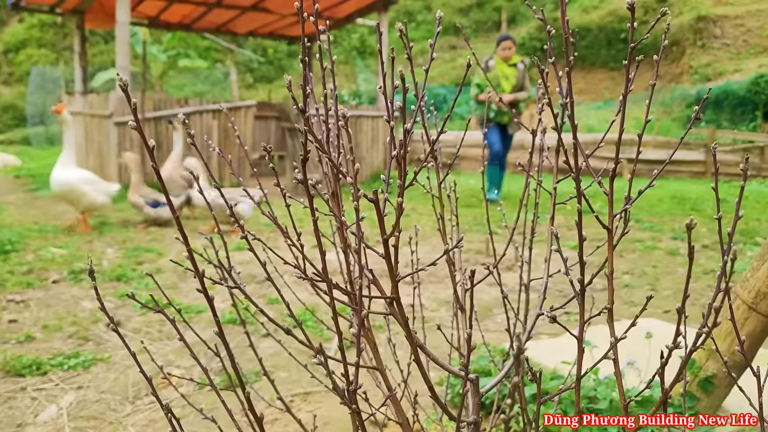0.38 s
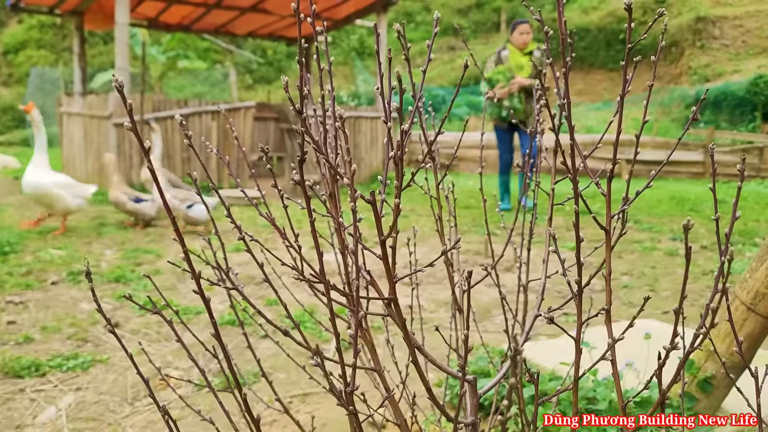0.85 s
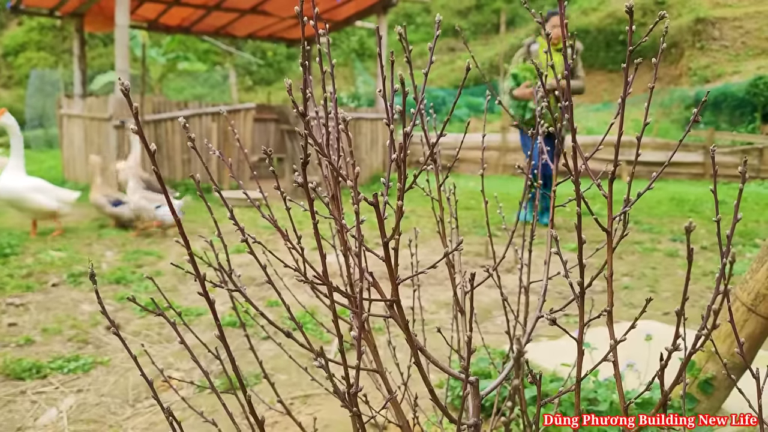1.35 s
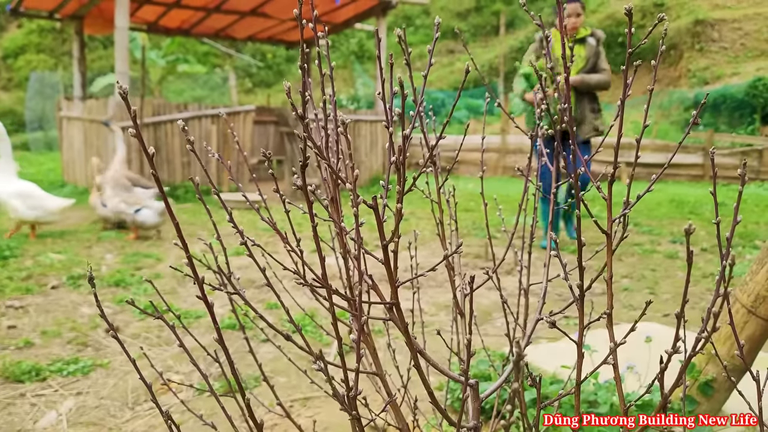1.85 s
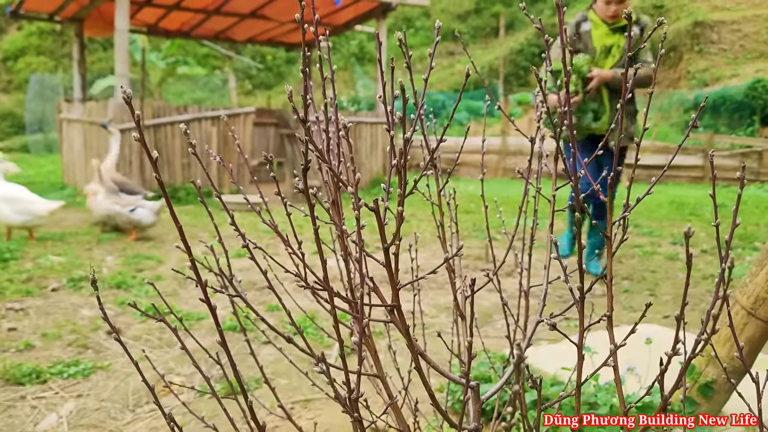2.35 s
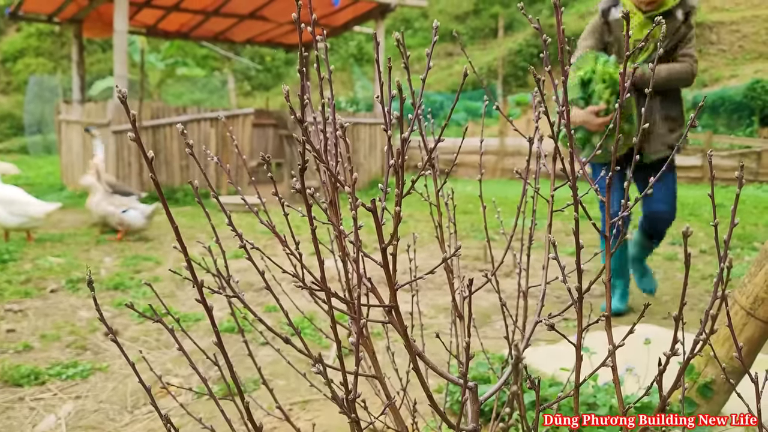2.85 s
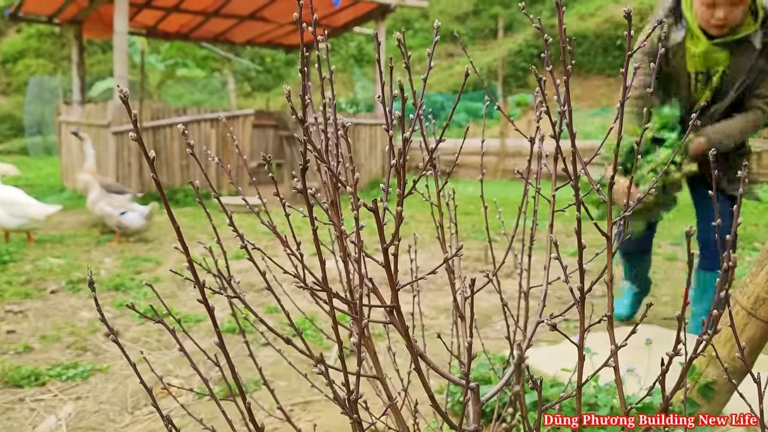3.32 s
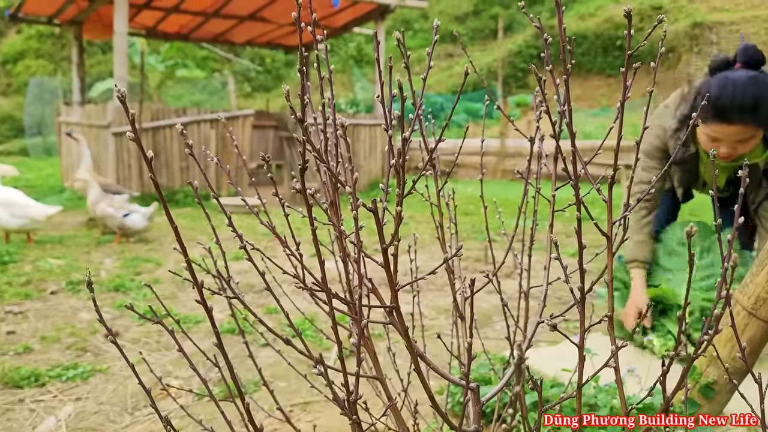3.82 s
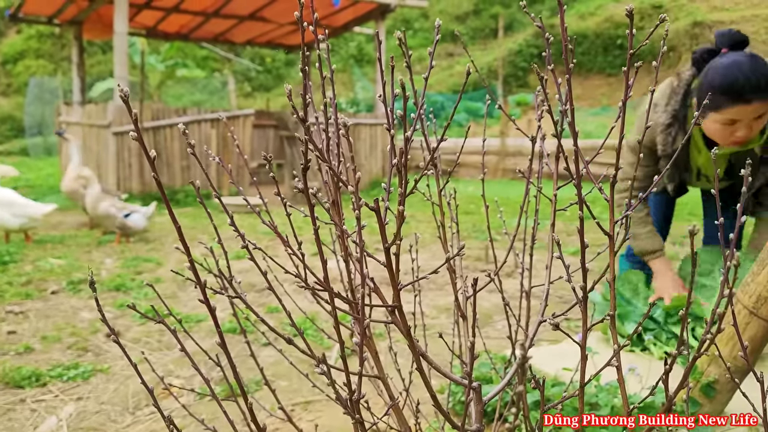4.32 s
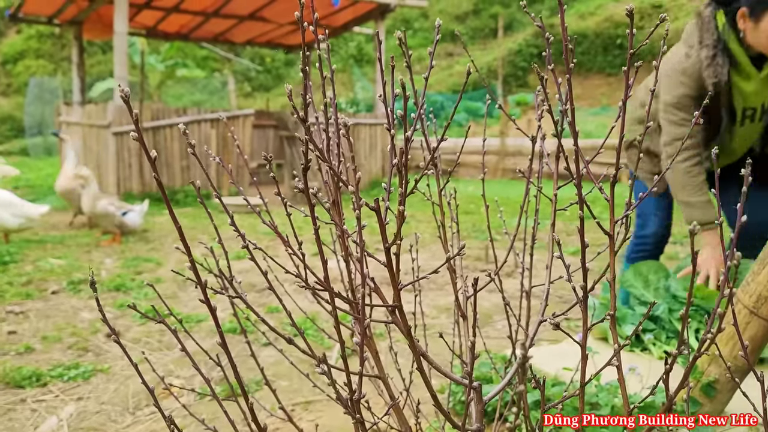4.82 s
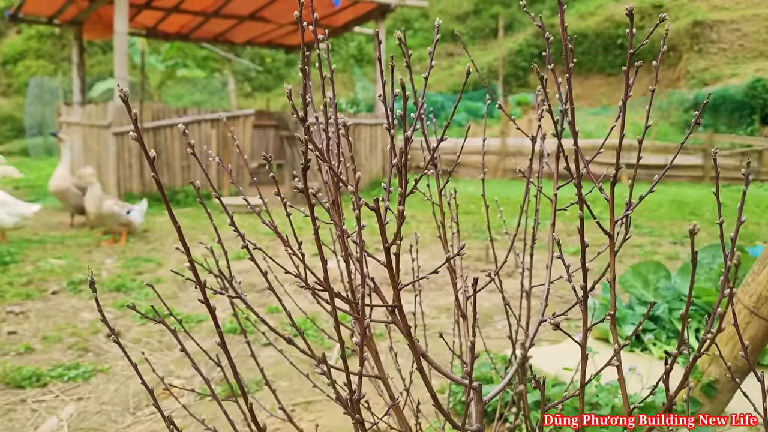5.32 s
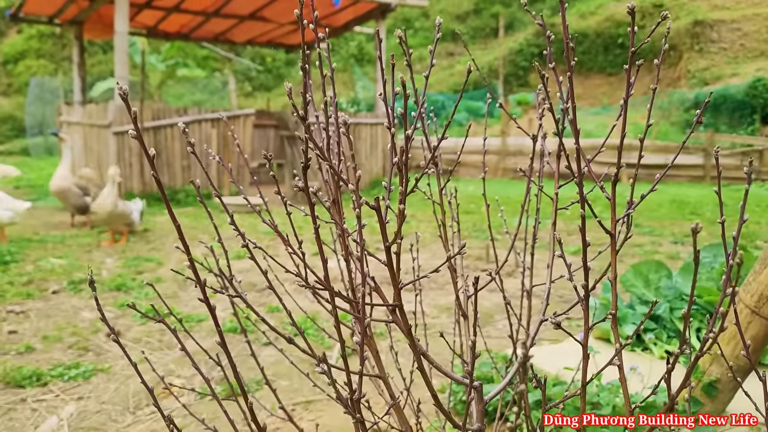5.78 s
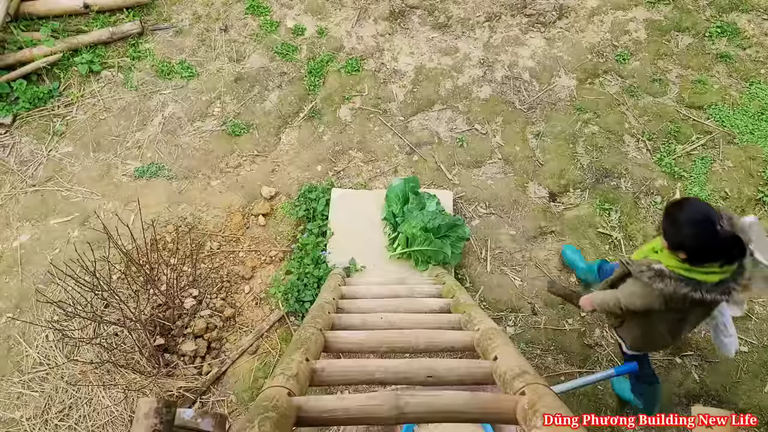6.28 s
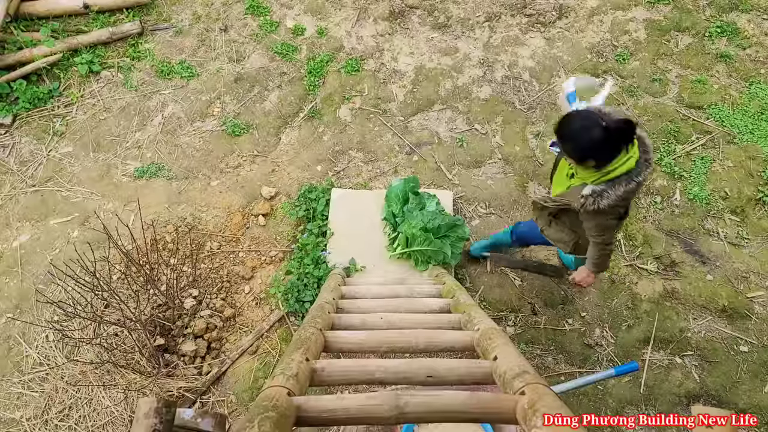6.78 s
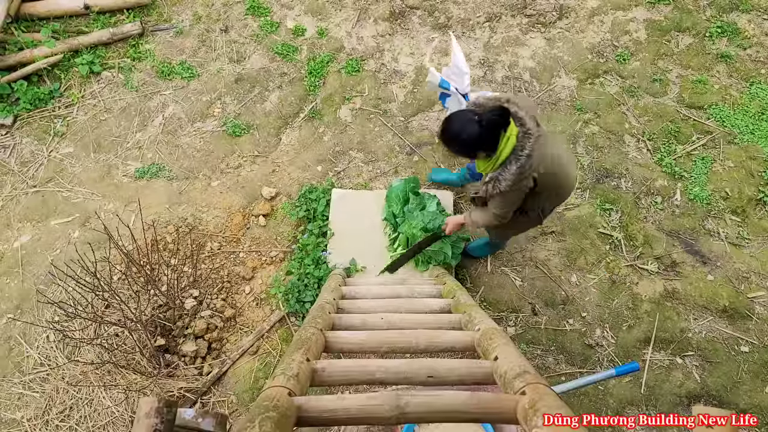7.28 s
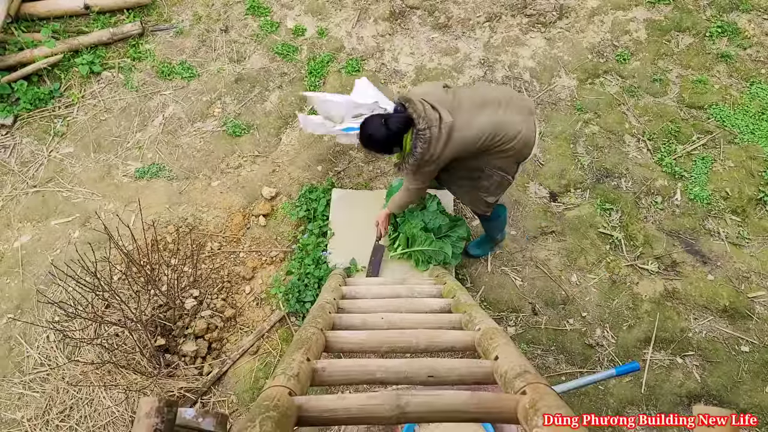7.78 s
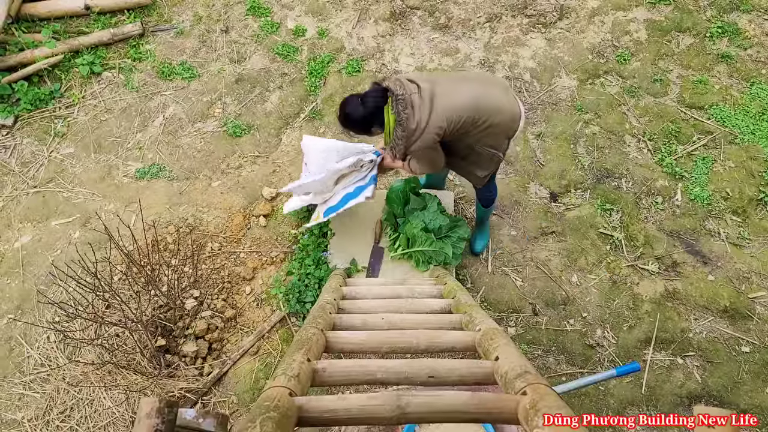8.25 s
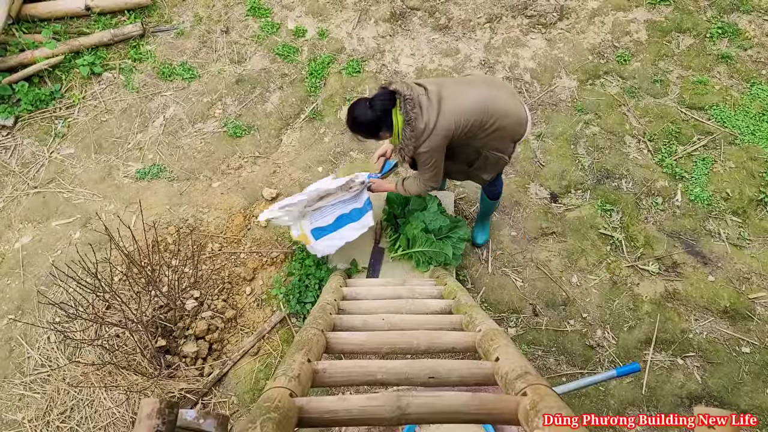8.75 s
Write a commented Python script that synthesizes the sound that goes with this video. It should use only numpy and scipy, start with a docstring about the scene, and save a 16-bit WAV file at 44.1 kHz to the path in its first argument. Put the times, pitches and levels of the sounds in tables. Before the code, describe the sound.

Two geese honk by turns in a farm yard, harsh and brassy, with low grunts, boot thumps, rustling leaves and a knife clinking on a slab.

```python
"""Two geese honk in turn on a farm yard: several windpipe modes sound at once and the lead hops between them;
a membrane driven by the modes adds overtones and rasp. Thin whimpers glide; low grunts are pulses ringing
chest and throat. Boots thump damped sines into soil, leaves and a sack rustle as noise grains, a steel knife
rings on a slab. Air, insects, breeze and a faint yard echo lie under it. A 64 ms silence parts two spots;
in the second one the short honks come from another direction."""
import sys
import numpy as np
from scipy import signal
from scipy.fft import rfft, irfft, next_fast_len
from scipy.io import wavfile
from scipy.ndimage import uniform_filter1d, minimum_filter1d, map_coordinates

SR = 44100
rng = np.random.default_rng(int(sys.argv[2]) if len(sys.argv) > 2 else 0)


def invert_db(x):
    """Field ratio 10**(x/20) for x, a level in decibels (scalar or array-like)."""
    u = np.asarray(x, float) / 20
    return 10 ** u


def transcribe(signal):
    """Save signal, clipped to [-1, 1], as a 16-bit WAV file at the path in sys.argv[1]."""
    frames = np.atleast_2d(signal).T
    limited = np.clip(frames, -1, 1)
    pcm = np.round(limited * 32767).astype(np.int16)
    wavfile.write(sys.argv[1], SR, pcm)


N = 402633
TIME_S = np.arange(N) / SR

# far yard noise: hz, density_db
AIR_SPECTRUM = [(60, -31), (110, -9), (270, -8.5), (600, -11), (1700, -8), (3100, -12.5), (3700, -20),
                (6800, -24), (7600, -42), (11000, -34.5), (15000, -40.5)]
# far yard noise: time_s, level_db
AIR_LEVEL = [(0, -56), (2.6, -56), (3.6, -52.5), (5, -52.5), (6.1, -56.5), (6.3, -54), (9.13, -51)]
# far yard noise: hz, left_right_correlation
AIR_CORRELATION = [(100, 0.75), (1000, -0.6), (12000, 0.21)]
# far yard noise: hz, left_over_right_db
AIR_LEAN = [(600, 3), (9000, 1)]
# thin far tones: pitch_hz, half_width_hz, level_db, start_s, end_s
INSECTS = [(1710, 40, -74, 0, 1.5), (7800, 40, -81, 6.25, 9.13)]
# breeze on the microphones, before each one's offset: time_s, level_db
BREEZE_LEVEL = [(0, -69.5), (2.5, -66), (3.6, -67), (5.8, -69), (6.3, -72.5), (9.13, -73.5)]
# boot on soil: start_s, level_db, pitch_hz
STEPS = [(0.037, -45, 560), (0.584, -46, 560), (0.713, -44, 262), (0.826, -49.5, 558.6),
         (1.172, -37, 177.6), (2.688, -50, 153), (2.717, -42, 180), (2.817, -47, 254),
         (3.198, -47.5, 434.7), (3.24, -34, 230), (3.54, -46, 222.5), (3.577, -37.5, 250),
         (6.058, -39, 176)]
# echo of shed and slope: hz, t60_s
YARD_DECAY = [(300, .15), (1500, .16), (8000, .1)]

# short honks: start_s, time_stretch, top_pitch_hz, low_mode_db, main_mode_db, high_mode_db, rasp_db
# (the dB columns are added to the shared course)
SHORT_HONKS = [(0.108, 0.87, 1406, -13.5, -21.5, -27, -28.5), (1.035, 0.9, 1381, -18, -23, -22, -34),
               (1.969, 1.005, 1425, -21, -19, -21.5, -29.5), (3.278, 0.89, 1381, -29.5, -20.5, -26.5, -33),
               (4.04, 0.94, 1395, -24.5, -21, -23.5, -34), (5.035, 1.018, 1426, -19, -16.5, -25.5, -29),
               (7.57, 1, 1430, -25, -23.5, -25, -29.5), (8.322, 1.09, 1433, -24.5, -27, -27, -28.5)]
# shared course of the short honks; the low mode speaks first and last, the high one only at full effort:
# age_s (before stretch), pitch_over_top, low_mode_db, main_mode_db, high_mode_db, rasp_db
SHORT_COURSE = [(0, 0.98, -40, -51, -31.5, -42), (.015, 0.84, -6, -21.5, -16, -10.5),
                (0.041, 0.97, 3, -15.5, -13.5, -5), (0.067, 1, -5, -3, -3.5, 2.5),
                (0.091, 0.96, -8.5, 0, 0.5, 1.5), (0.132, 0.97, -1, -8, -24, -7),
                (.17, .93, -12, -16.5, -24, -17.5), (0.251, .88, -33.5, -43, -42.5, -40)]
# position of each short honk: left_over_right_db, left_lag_samples
SHORT_PLACES = [(-2.5, -21), (-3, -21), (-5, -21), (-6.5, -21), (-6.5, -21), (-3, -21), (-1, 9), (-1.5, 9)]
# windpipe modes of the short honks: multiple_of_main_mode
SHORT_PIPE = [.849, 1, 1.23]
# membrane overtones of the short honks: multiple, relative_db
SHORT_OVERTONES = [(2, -7), (3, -6), (4, -11.5), (5, -12.5)]
# modes of the short honks that only breath excites: hz_at_top_pitch, wobble_knots_per_s, relative_db
SHORT_RINGS = [(530, 60, -20), (900, 140, -10), (2050, 80, -10), (2370, 200, -16), (2880, 300, -14),
               (3200, 250, -15), (3500, 300, -15), (3970, 260, -11), (4300, 400, -11), (5170, 300, -9),
               (4750, 300, -13), (5830, 350, -18)]
# long honks: breath_start_s, settled_pitch_hz, rasp_db at full voice, hiss_over_rasp_db
LONG_HONKS = [(1.405, 1299, -26, -34), (5.384, 1309, -19, -33), (6.148, 1292, -29.5, -22.5),
              (7.264, 1325, -22, -19), (8.61, 1335, -22.5, -18)]
# voice of each long honk: time_s, level_db, leading_mode_number (0 = lowest)
LONG_VOICES = [
    [(1.405, -60.5, 1.35), (1.435, -19, 1.37), (1.455, -2.5, 2.4), (1.49, -2.5, 1.97), (1.555, -7.5, 2.2),
     (1.58, -26, 1.14), (1.625, -26, 0.57), (1.66, -28, 1.37), (1.785, -44, 1)],
    [(5.385, -77, 1), (5.405, -27, 0.92), (5.425, -9, 1.91), (5.455, 1, 1.5), (5.475, -5, 2.06),
     (5.56, -11, 2.17), (5.6, -16, 1.2), (5.65, -19.5, 1.02), (5.7, -25.5, 1.65), (5.819, -48, 1.3)],
    [(6.25, -42, 2), (6.275, -21.5, 2.04), (6.32, -27.5, 1.83), (6.37, -31.5, 0.87), (6.415, -20, 0.73),
     (6.49, -35.5, 0.83), (6.519, -61, 1.5)],
    [(7.265, -63, 1), (7.29, -28, 0.81), (7.315, -9.5, 1.33), (7.35, -11, 1.79), (7.4, -6, 2.22),
     (7.445, -18.5, 1.94), (7.48, -17.5, 1.39), (7.53, -14, 1.47), (7.579, -33, 0.78)],
    [(8.61, -70, 1), (8.64, -17.5, 1.45), (8.685, -7.5, 1.3), (8.712, -9, 2.1), (8.79, -13, 2),
     (8.82, -13, 1.8), (8.89, -28.5, 2), (8.94, -16, 1.38), (8.97, -16, 1.2), (9.0, -23, 1.56),
     (9.047, -21.5, 1.79), (9.109, -51, 1.4)],
]
# position of each long honk: left_over_right_db, left_lag_samples
LONG_PLACES = [(-1, 13), (-3.5, -21), (0, 11), (1, 12), (0, 10)]
# windpipe modes of the long honks: multiple_of_main_mode
LONG_PIPE = [.641, .83, 1, 1.181]
# membrane overtones of the long honks: multiple, relative_db
LONG_OVERTONES = [(2, -4), (3, -1), (4, -6), (5, -12), (6, -17), (8, -22), (9, -23), (11, -27)]
# modes of the long honks that only breath excites: hz_at_top_pitch, wobble_knots_per_s, relative_db
LONG_RINGS = [(1600, 150, -14), (2450, 250, -14), (3200, 250, -16), (4450, 250, -15), (5500, 400, -16),
              (1880, 180, -14), (2220, 160, -16), (2900, 260, -17), (3500, 180, -15), (4120, 180, -15),
              (4730, 300, -16)]
# rasp of the membrane: hz, density_db
RASP_SPECTRUM = [(300, -36), (500, -22.5), (1200, 28), (2200, 1), (3000, 6), (4500, 3.3), (6500, 2.5),
                 (7400, -18), (15000, -42)]
# air through the open bill: hz, density_db
HISS_SPECTRUM = [(4000, -31), (7000, 0), (10500, 0), (13000, -3.5), (15500, -7)]

# whimpers after long honks, peeps before grunts: start_s, length_s, first_hz, last_hz, level_db
PEEPS = [(1.773, 0.096, 1035, 912, -44), (1.86, 0.06, 756, 740, -48.5), (1.926, .035, 720, 724, -50),
         (4.734, 0.09, 1875, 1930, -55), (4.937, .11, 835, 685, -50.5), (5.681, 0.12, 1580, 1537, -43),
         (5.831, 0.056, 1025, 885, -44), (5.887, 0.069, 746, 695, -43), (5.959, .043, 760, 630, -45),
         (6.526, 0.0447, 1064, 887, -49.5), (6.56, .038, 806, 645, -52), (6.626, 0.043, 726, 743, -37.5),
         (6.778, 0.044, 1190, 1400, -51), (6.815, 0.035, 916, 760, -41.5), (6.891, 0.022, 1233, 1000, -48),
         (7.123, 0.023, 1370, 1170, -43.5)]
# low grunts: start_s, length_s, chest_db, throat_db, throat_tuning_ratio
GRUNTS = [(2.174, 0.15, -53.5, -45, 0.91), (2.308, 0.12, -51, -40.5, 1), (4.64, 0.059, -51.5, -52, .83),
          (4.806, 0.1, -52.5, -48.5, 0.78), (4.889, 0.072, -54.5, -75, 1.09), (4.974, 0.19, -47, -40, 0.93),
          (5.164, 0.033, -47.5, -56, 1.3), (5.203, .11, -63, -46, 0.95), (5.29, 0.033, -53, -53, .76),
          (6.062, .11, -53.5, -45.5, 1.01), (6.384, 0.044, -60, -50, 0.92), (6.479, .04, -51.5, -38, 0.81),
          (6.58, .04, -59.5, -49.5, .53), (6.644, .095, -45, -35.5, 0.895),
          (6.755, 0.039, -57.5, -51, 0.75), (6.828, 0.048, -51, -33.5, 0.95),
          (6.907, 0.058, -50.5, -39, 0.85), (7.143, 0.08, -56.5, -38, .88),
          (7.892, 0.099, -57.5, -41.5, 0.85), (8.109, 0.091, -54, -38.5, 0.89)]
# chest resonances: hz, width_hz, relative_db
CHEST_MODES = [(181.3, 36, 1.4), (340, 42, 0), (490, 167, -10.5)]
# throat resonances, before tuning: hz, width_hz, relative_db
THROAT_MODES = [(760, 82, -7.5), (1215, 71, 2), (1454, 390, -6), (2400, 740, -15.5), (4260, 450, -28.5)]
# handfuls of leaves, cloth and sack: start_s, rise_s, fall_db_per_s, level_db before the ears are mixed
RUSTLES = [(3.502, 0.37, 27.5, -61), (4.36, 0.033, 113, -46), (4.459, 0.017, 76, -51.5),
           (6.239, 0.019, 47.5, -53), (7.2, 0.18, 23.5, -58), (7.65, .14, 207, -44), (8.2, 0.13, -6, -52.5)]
# snaps of stalks and folds: start_s, level_db
SNAPS = [(3.0664, -48.5), (3.186, -46), (3.3004, -39.5), (4.3893, -32.5), (6.588, -52), (7.7428, -35.5),
         (7.7816, -32), (7.8294, -40.5)]
# leaf noise: hz, density_db
LEAF_SPECTRUM = [(240, -35), (400, -14.5), (621, -16.5), (880, -12), (979, -27), (3290, -18), (4330, -20.5),
                 (15000, -38.5)]
# knife contacts: start_s, level_db
KNIFE_CONTACTS = [(7.9922, -24.5), (8.0499, -32.5), (8.0707, -29.5), (8.1224, -39.5)]
# blade modes: hz, mean_relative_db, t60_s
BLADE_MODES = [(810, -12, .3), (2100, -12, .08), (2730, 1, .28), (3050, -12, .06), (3600, -11, .1),
               (4390, -13, .05), (5160, -12, .08)]
# silence between the two spots: start_s, end_s
BREAK_S = (6.187, 6.251)


def unit(x):
    """Scale to rms 1."""
    return x / np.sqrt(np.mean(np.abs(x) ** 2) + 1e-20)


def along(points, hz):
    """Interpolate (hz, value) points on a log frequency axis."""
    f, v = np.transpose(points)
    return np.interp(np.log(hz + 1), np.log(f + 1), v)


def span(rows):
    """First sample, the columns read at every sample, and a 4.5 ms fade at both ends."""
    s, *cols = np.transpose(rows)
    t = TIME_S[int(s[0] * SR):int(s[-1] * SR)]
    fade = np.clip(np.minimum(t - s[0], s[-1] - t) / 0.0045, 0, 1)
    return int(s[0] * SR), np.array([np.interp(t, s, c) for c in cols]), fade


def wobble(knots_per_s, size):
    """Smooth random curve through random knots."""
    knots = rng.standard_normal(int(size * knots_per_s / SR) + 4)
    return map_coordinates(knots, [np.arange(size) * knots_per_s / SR])


def filtered(x, response):
    """Multiply the spectrum of x by a complex response of frequency."""
    m = next_fast_len(x.shape[-1] + 4096)
    return irfft(rfft(x, m) * response(np.fft.rfftfreq(m, 1 / SR)), m)[..., :x.shape[-1]]


def coloured(spectrum, size):
    """Noise of rms 1 with the given spectrum."""
    return unit(filtered(rng.standard_normal(size), lambda hz: invert_db(along(spectrum, hz))))


def resonances(modes):
    """Causal response of (hz, width_hz, db) modes, summed with alternating sign."""
    def mode(f, hz, width_hz, db):
        damping = 1j * f * width_hz
        return invert_db(db) * damping / (hz * hz - f * f + damping)
    return lambda f: sum((-1) ** k * mode(f, *row) for k, row in enumerate(modes))


def placed(x, left_over_right_db, left_lag_samples):
    """Mono sound at two microphones, set apart by level and delay."""
    side = np.array([[1], [-1]])

    def response(hz):
        delay = np.exp(-1j * np.pi * side * hz * left_lag_samples / SR)
        return invert_db(side * left_over_right_db / 2) * delay
    return filtered(x, response)


def add(out, start, x):
    """Mix x into out from sample start."""
    out[..., start:start + x.shape[-1]] += x[..., :N - start]


def air():
    """Far yard noise, partly correlated between the microphones, plus narrow-band noise as insect tones."""
    def angle(hz):
        return np.arccos(np.clip(along(AIR_CORRELATION, hz), -1, 1)) / 2

    def mid_side(hz):
        return invert_db(along(AIR_SPECTRUM, hz)) * [np.cos(angle(hz)), np.sin(angle(hz))]
    mid, side = filtered(rng.standard_normal((2, N)), mid_side)
    halves = np.array([[.5], [-.5]])
    pair = filtered(np.array([mid + side, mid - side]), lambda hz: invert_db(along(AIR_LEAN, hz) * halves))
    level_db = np.interp(TIME_S, *np.transpose(AIR_LEVEL)) + 1.6 * wobble(1.643, size=N)
    out = unit(pair) * invert_db(level_db)
    for hz, half_width_hz, db, first_s, last_s in INSECTS:
        tone = filtered(rng.standard_normal(N), lambda f: np.exp(-((f - hz) / half_width_hz) ** 2))
        present = (TIME_S > first_s) & (TIME_S < last_s)
        out = out + invert_db(db + 3.4 * wobble(9.9, size=N)) * unit(tone) * present
    return out


def breeze():
    """Lumpy low rumble, independent at each microphone."""
    db = np.interp(TIME_S, *np.transpose(BREEZE_LEVEL))
    spectrum = [(15, -26.5), (40, -5), (75, 2.0), (130, -22.0), (300, -42.5)]  # hz, density_db
    ears = []
    for offset_db in (5, -1.5):
        lumps = invert_db(4.6 * wobble(8.1, size=N))
        ears.append(invert_db(db + offset_db) * unit(lumps * coloured(spectrum, size=N)))
    return np.array(ears)


def steps():
    """Each boot contact is a short damped sine with a puff of grit noise."""
    out, t = np.zeros(N), TIME_S[:SR // 10]
    grit = [(100, -4.5), (400, -5.5), (1000, -13.5), (3000, -41), (8000, -42.0)]  # hz, density_db
    onset = 1 - np.exp(-t / 0.00035)
    for s, db, hz in STEPS:
        thump = invert_db(-60 * t / 0.044) * np.sin(2 * np.pi * hz * t)
        puff = .5 * invert_db(-60 * t / 0.084) * coloured(grit, size=len(t))
        add(out, round(s * SR), invert_db(db) * (thump + puff) * onset)
    return placed(out, -6.5, 3)


def yard(x):
    """Diffuse echo: a noise tail in which each frequency dies at its own speed."""
    hz, t, z = signal.stft(rng.standard_normal((2, SR // 4)), SR, nperseg=256)
    decay = invert_db(-60 * t / along(YARD_DECAY, hz)[:, None])
    tail = signal.istft(z * decay, SR, nperseg=256)[1]
    late = np.pad(x, ((0, 0), (300, 0)))  # samples
    return signal.fftconvolve(late, tail / np.linalg.norm(tail[0]), axes=1)[:, :N]


def short_honk(s, time_stretch, top_hz, *offsets_db):
    """One shared course, stretched in time and set to this honk's pitch and mode strengths."""
    rows = [(s + time_stretch * age_s, *cols) for age_s, *cols in SHORT_COURSE]
    start, (ratio, *course_db), fade = span(rows)
    *mode_db, rasp_db = np.array(course_db) + np.array(offsets_db)[:, None]
    hiss_over_rasp_db = -32.5
    return start, top_hz * ratio, mode_db, rasp_db, hiss_over_rasp_db, fade


def long_honk(s, settled_hz, full_rasp_db, hiss_over_rasp_db, voice):
    """The lead hops between modes; pitch scoops up, then follows the voice; the rasp follows and tires."""
    scoop_ratio, scoop_s, hz_per_db = .17, .022, 2.5
    loss_db_per_mode, readiness_db = 22, [2, 2, -0.5, -13]  # loss away from the lead; one readiness a mode
    rasp_db_per_voice_db, rasp_tires_db_per_s = 0.73, 24
    rasp_lag_s, bill_opening_s = 0.039, 0.025
    start, (db, lead), fade = span(voice)
    age_s = np.maximum(TIME_S[start:start + len(fade)] - s, 1e-4)
    scoop = 1 - scoop_ratio * np.exp(-age_s / scoop_s)
    main_hz = settled_hz * scoop + hz_per_db * np.maximum(db - db.max(), -25)
    mode_db = [db + ready_db - loss_db_per_mode * np.abs(lead - k) for k, ready_db in enumerate(readiness_db)]
    # the rasp rounds off quick drops of the voice
    lag = int(rasp_lag_s * SR)
    lagged_db = np.maximum(db, uniform_filter1d(db, size=lag, origin=(lag - 1) // 2, mode='nearest'))
    opening_db = 40 * np.log10(1 - np.exp(-age_s / bill_opening_s))
    following_db = rasp_db_per_voice_db * (lagged_db - db.max())
    rasp_db = opening_db + full_rasp_db + following_db - rasp_tires_db_per_s * age_s
    return start, main_hz, mode_db, rasp_db, hiss_over_rasp_db, fade


def scattered(pair):
    """Ground, fence and other birds add a short random spray of reflections at each microphone."""
    t60_s, over_direct_db = .018, -2
    t = TIME_S[:int(t60_s * SR)]
    spray = rng.standard_normal((2, len(t))) * invert_db(-60 * t / t60_s)
    spray = invert_db(over_direct_db) * spray / np.linalg.norm(spray, axis=1, keepdims=True)
    reflections = signal.fftconvolve(pair, spray, axes=1)[:, :pair.shape[1]]
    return (pair + reflections) / np.hypot(1, invert_db(over_direct_db))


def blown_rings(rings, main_hz):
    """Breath alone excites further pipe modes as narrow noise; they slide half as far as the main mode."""
    n = len(main_hz)
    slide = 2 * np.pi * np.cumsum(np.sqrt(main_hz / main_hz.max())) / SR
    out = np.zeros(n)
    for hz, knots_per_s, db in rings:
        cosine = wobble(knots_per_s, size=n) * np.cos(hz * slide)
        sine = wobble(knots_per_s, size=n) * np.sin(hz * slide)
        out += invert_db(db + 3.34 * wobble(18.5, size=n)) * (cosine + sine)
    return out


def goose(honks, places, pipe, overtones, rings, waver_hz, flutter_db, skirt_db, breath_db):
    """Pipe modes sound together; the membrane they drive adds overtones, sum tones and a beating rasp."""
    skirt_db_per_effort_db = .45
    out = np.zeros((2, N))
    for (start, main_hz, mode_db, effort_db, hiss_db, fade), (pan_db, lag) in zip(honks, places):
        n = len(fade)
        waver = np.array([wobble(73.7, size=n) for _ in pipe])
        phase = 2 * np.pi * np.cumsum(np.outer(pipe, main_hz) + waver_hz * waver, axis=1) / SR
        flutter = invert_db(flutter_db * np.array([wobble(59.0, size=n) for _ in pipe]))
        modes = invert_db(np.array(mode_db)) * flutter * np.exp(1j * phase)
        # breath turbulence spreads a faint skirt round every mode, stronger as the effort drops
        turbulence_db = np.minimum(skirt_db + skirt_db_per_effort_db * (effort_db.max() - effort_db), 0)
        turbulence = np.array([wobble(350, size=n) + 1j * wobble(350, size=n) for _ in pipe])
        skirt = 1 + invert_db(turbulence_db) * turbulence
        # powers of the summed modes hold overtones and sum tones
        membrane = modes.sum(0) / np.abs(modes).sum(0)
        upper = sum(invert_db(db) * (membrane ** k).real for k, db in overtones)
        breath = coloured(RASP_SPECTRUM, size=n) * (1.3 + np.abs(membrane) ** 2)
        hiss = invert_db(hiss_db + 5.3 * wobble(29.3, size=n)) * coloured(HISS_SPECTRUM, size=n)
        rasp = invert_db(breath_db) * unit(breath) + blown_rings(rings, main_hz) + hiss
        voice = fade * np.sqrt(2) * (modes * skirt).sum(0).real
        harsh = fade * invert_db(effort_db) * (invert_db(1.5) * upper + rasp)
        add(out, start, placed(voice, pan_db, lag))
        add(out, start, scattered(placed(harsh, pan_db / 2 - 3, lag)))
    return out


def short_honks():
    """The first goose: a three-mode pipe with a fixed course of effort."""
    honks = [short_honk(*row) for row in SHORT_HONKS]
    return goose(honks, SHORT_PLACES, SHORT_PIPE, SHORT_OVERTONES, SHORT_RINGS,
                 waver_hz=10, flutter_db=2.5, skirt_db=-19, breath_db=-1.5)


def long_honks():
    """The second goose: a four-mode pipe whose lead hops."""
    honks = [long_honk(*row, voice) for row, voice in zip(LONG_HONKS, LONG_VOICES)]
    return goose(honks, LONG_PLACES, LONG_PIPE, LONG_OVERTONES, LONG_RINGS,
                 waver_hz=5, flutter_db=1.5, skirt_db=-24, breath_db=0)


def whimpers():
    """Thin gliding tones of four harmonics, each under a short arch."""
    out = np.zeros(N)
    for s, length_s, first_hz, last_hz, db in PEEPS:
        u = np.arange(int(length_s * SR)) / (length_s * SR)
        hz = first_hz + (last_hz - first_hz) * u + 10 * wobble(60, size=len(u))
        phase = 2 * np.pi * np.cumsum(hz) / SR
        harmonics = [(1, 0), (2, -13), (3, -23), (4, -22)]  # multiple, relative_db
        tone = sum(invert_db(level_db) * np.sin(k * phase) for k, level_db in harmonics)
        tone = filtered(tone, lambda f: 1 / (1 + (f / 4000) ** 8))
        swell = invert_db(db + 2.2 * wobble(47, size=len(u))) * np.sqrt(np.sin(np.pi * u))
        add(out, int(s * SR), swell * tone)
    return placed(out, -0.6, 2.1)


def grunts():
    """Slow uneven pulses with gated breath ring chest and throat; the rate arches over each grunt."""
    base_hz, spread_ratio = 93, .07  # pulse rate before the arch; scatter from grunt to grunt
    out = np.zeros((2, N))
    for s, length_s, chest_db, throat_db, tuning in GRUNTS:
        hz = base_hz * (1 + spread_ratio * rng.standard_normal())
        n = int(length_s * SR)
        u = np.arange(n) / n
        swell = np.abs(np.sin(np.pi * u)) ** 0.65 * invert_db(0.65 * wobble(40, size=n))
        arch = .92 + .12 * np.sin(np.pi * u ** 1.4) + 0.12 * wobble(60, size=n)
        cycles = rng.random() + np.cumsum(hz * arch) / SR
        pulses = np.diff(np.floor(cycles), prepend=0) * invert_db(3 * rng.standard_normal(n))
        breath = rng.standard_normal(n) * np.exp(-2.5 * (cycles % 1))
        chest = filtered(unit(pulses) + .4 * unit(breath), resonances(CHEST_MODES))
        throat = filtered(unit(pulses) + 1.3 * unit(breath), lambda f: resonances(THROAT_MODES)(f / tuning))
        add(out, int(s * SR), placed(swell * invert_db(chest_db) * unit(chest), -8.0, 4.4))
        add(out, int(s * SR), placed(swell * invert_db(throat_db) * unit(throat), -2.3, 9.93))
    return out


def rustle():
    """Dense crackling noise grains under the hands' motion, with a few loud snaps."""
    out, t = np.zeros((2, N)), TIME_S[:SR // 20]
    start = int(RUSTLES[0][0] * SR)
    now, n = TIME_S[start:], N - start
    motion = np.zeros(n)
    for s, rise_s, fall_db_per_s, db in RUSTLES:
        rise = np.clip((now - s) / rise_s, 0, 1) ** 2
        motion += rise * invert_db(db - fall_db_per_s * np.maximum(now - s - rise_s, 0))
    grains = invert_db(3.5 * wobble(250, size=n) + 2 * wobble(25, size=n))
    for ear in out:
        add(ear, start, motion * unit(grains * coloured(LEAF_SPECTRUM, size=n)))
    out = out + .5 * out[::-1]  # each microphone hears much of what the other does
    for s, db in SNAPS:
        snap = invert_db(db - 60 * t / 0.06) * coloured(LEAF_SPECTRUM, size=len(t))
        add(out, round(s * SR), placed(snap, -0.5, -7.5))
    return out * invert_db([[-1.5], [1.5]])


def knife():
    """Every contact rings the blade modes at new strengths over a noise scrape of stone."""
    out, t = np.zeros(N), TIME_S[:SR // 3]
    stone = [(300, -4.0), (900, -2.5), (3500, 9.5), (8000, -10.5), (15000, -26.5)]  # hz, density_db
    onset = 1 - np.exp(-t / 0.0025)
    for s, db in KNIFE_CONTACTS:
        ring = np.zeros(len(t))
        for hz, level_db, t60_s in BLADE_MODES:
            ring += invert_db(level_db + rng.normal(0, 3) - 60 * t / t60_s) * np.sin(2 * np.pi * hz * t)
        scrape = 0.86 * invert_db(-60 * t / 0.16) * coloured(stone, size=len(t))
        add(out, round(s * SR), invert_db(db) * (ring + scrape) * onset)
    return placed(out, -8.5, 8.2)


def scene():
    """Sum all sources; geese, boots and knife also feed the yard echo."""
    near = steps() + short_honks() + long_honks() + whimpers() + grunts() + knife()
    echo = invert_db(-22) * yard(near)
    return near + echo + rustle() + air() + breeze()


def top_cut(x):
    """Nothing passes above the cut-off."""
    return signal.sosfilt(signal.butter(12, 15670, fs=SR, output="sos"), x)


def record(dry):
    """A limiter turns down peaks above 0.93; a gate silences the break."""
    needed = np.minimum(1, .93 / (np.abs(dry).max(0) + 1e-9))
    gain = uniform_filter1d(minimum_filter1d(needed, size=801), size=401)
    outside_s = np.maximum(BREAK_S[0] - TIME_S, TIME_S - BREAK_S[1])
    gate = np.clip(outside_s / .003, 0, 1)
    return top_cut(dry * gain * gate)


dry = scene()
out = record(dry)
transcribe(out)
```